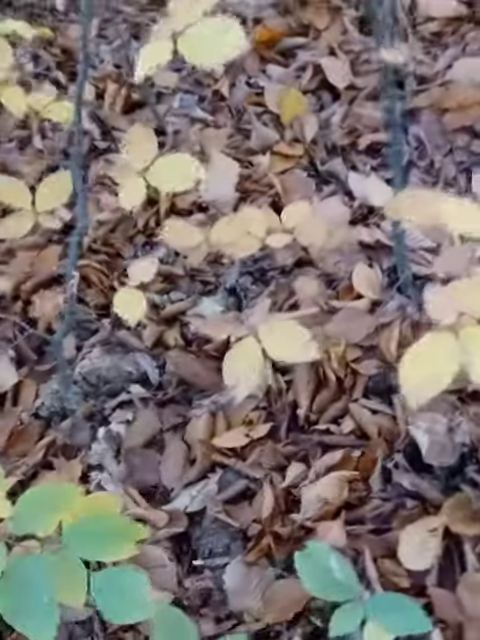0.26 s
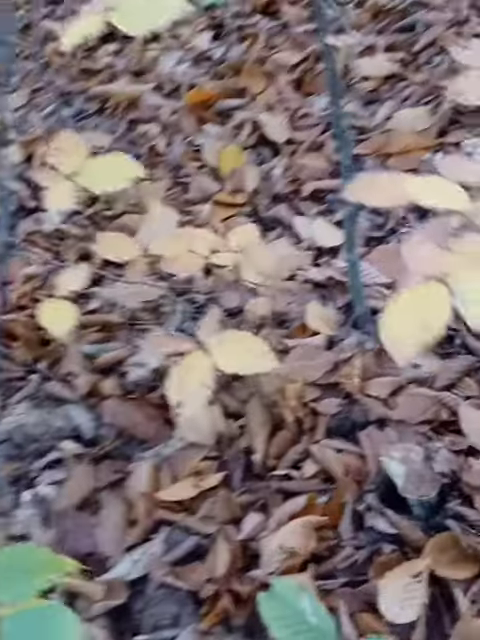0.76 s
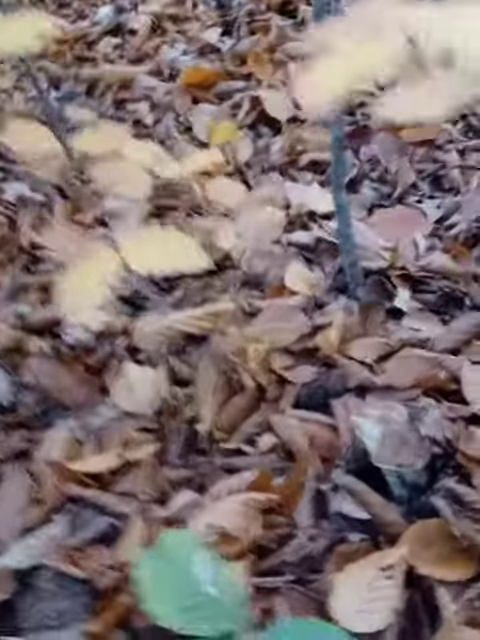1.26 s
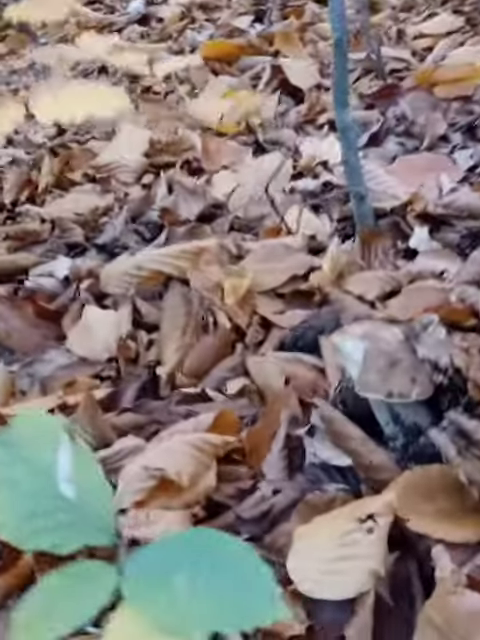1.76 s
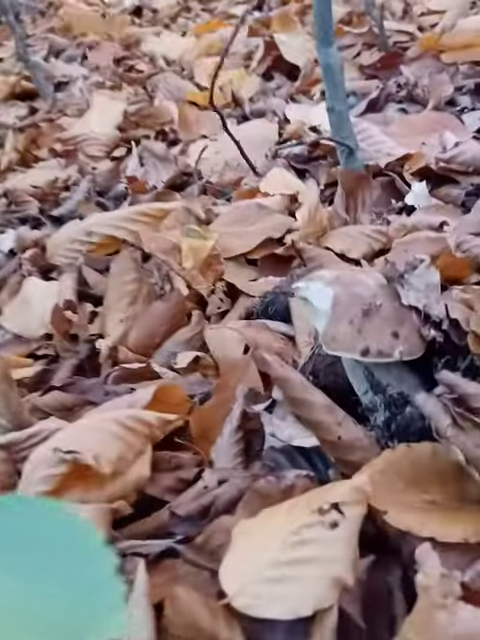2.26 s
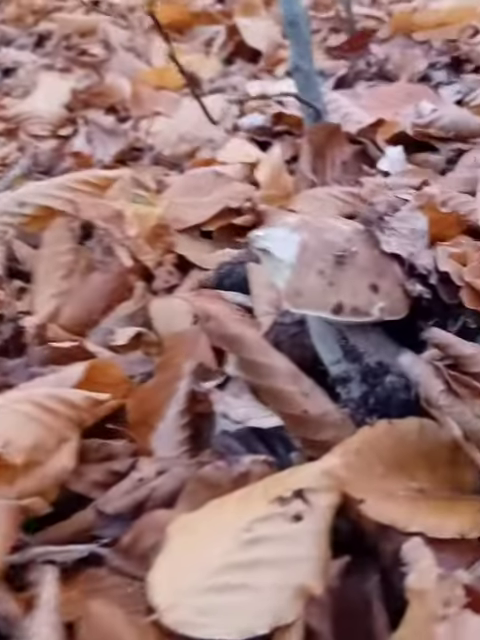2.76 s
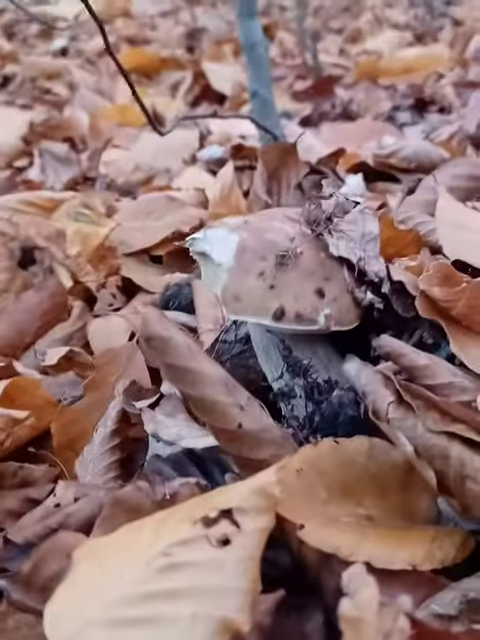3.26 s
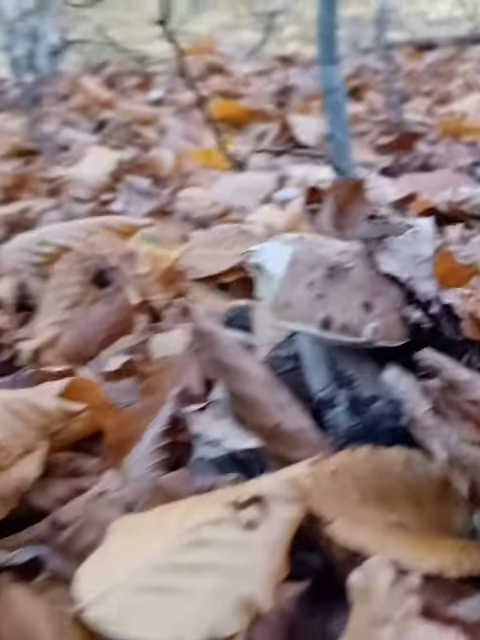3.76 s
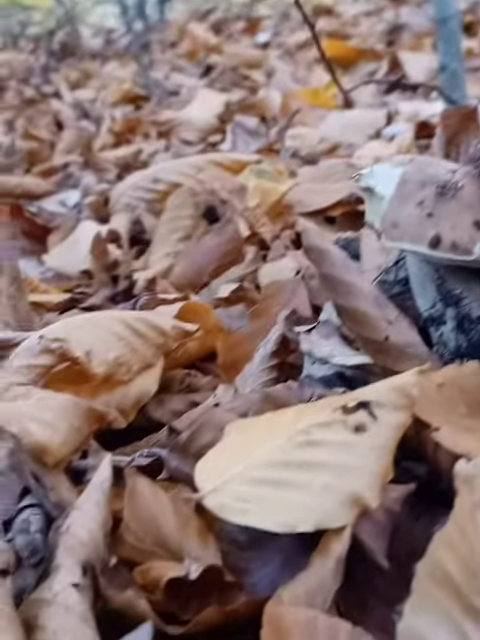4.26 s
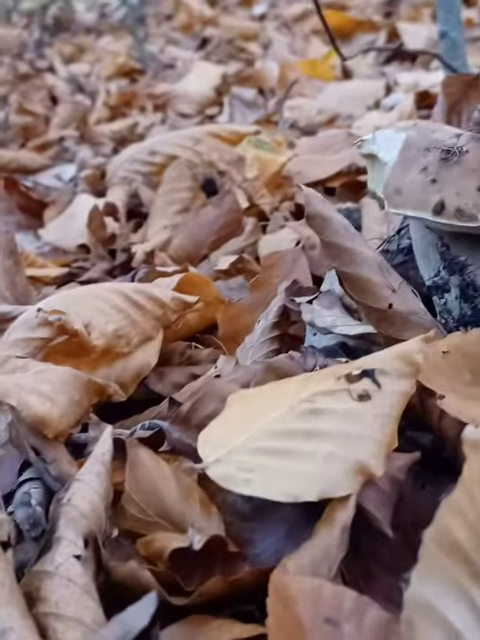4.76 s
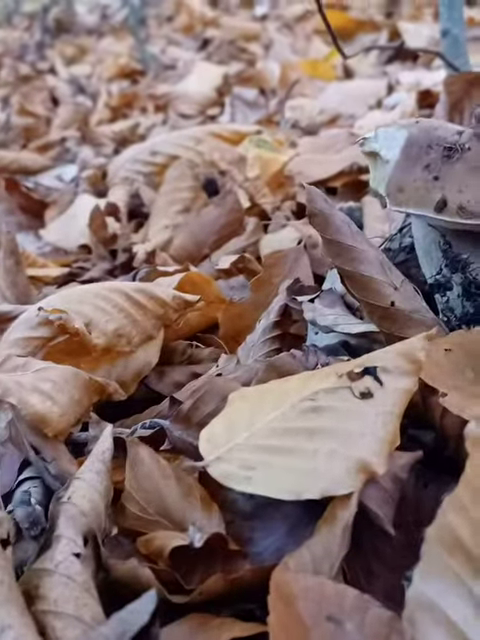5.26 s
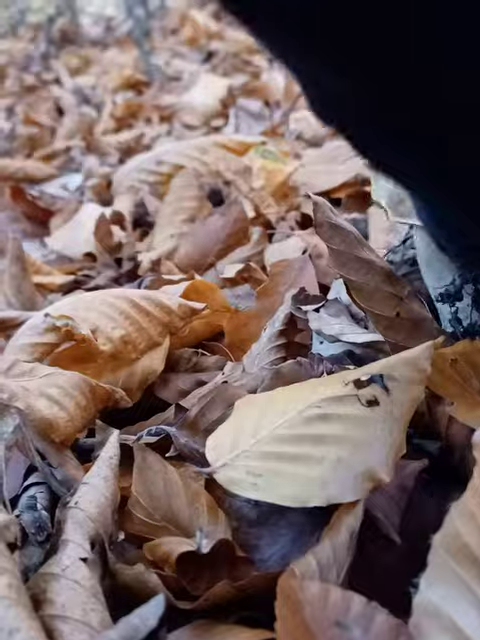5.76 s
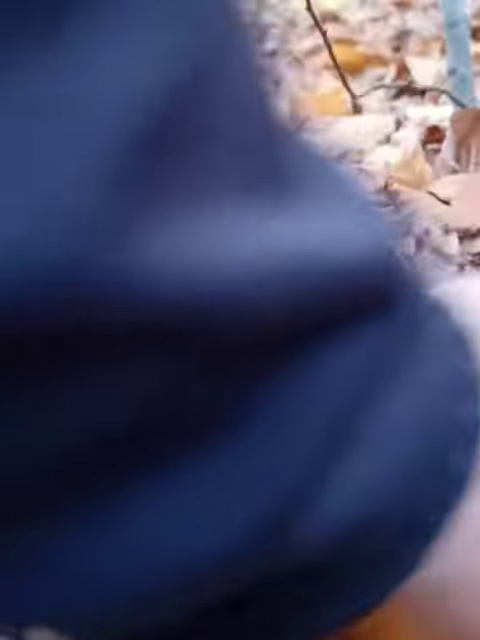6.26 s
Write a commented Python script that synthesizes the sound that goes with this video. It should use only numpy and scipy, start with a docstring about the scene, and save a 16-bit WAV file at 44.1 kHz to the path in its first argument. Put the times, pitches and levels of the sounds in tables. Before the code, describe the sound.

Feet shuffle through dry leaves, papery and crisp, with a strong crunch and snaps around one second. The rustle sinks to light crackling, then low muffled finger bumps and scratchy rubbing hit the right microphone. Sparse ticks follow in a quiet forest, until a sleeve and hand sweep close through the leaves, loud and hissing. Handheld phone, close, dry, stereo.

```python
"""Forest floor: feet shuffle through dry leaves, heard at a hand-held phone's two ports.
Noise chopped by thousands of tiny cracks makes the rustle, crumple and tread; larger snaps stand out.
Cloth hiss is mixed into the rustle throughout, fuller after 5.5 s.
Decaying sines make dull knocks and the bumps of a finger on the right port; shaped noise makes its rubbing.
Steady coloured noise is the faint forest air."""
import sys
import numpy as np
from scipy import signal
from scipy.io import wavfile
from scipy.ndimage import uniform_filter1d

SR = 44100
rng = np.random.default_rng(int(sys.argv[2]) if len(sys.argv) > 2 else 0)


def wav_record(signal):
    """Record a signal, one row per channel, as 16-bit PCM in the file named by sys.argv[1]."""
    frames = np.transpose(np.atleast_2d(signal))
    bounded = np.clip(frames, -1, 1)
    # unit amplitude maps onto the largest positive 16-bit level
    quanta = np.round(bounded * 32767).astype(np.int16)
    wavfile.write(sys.argv[1], SR, quanta)


N = 287159

# How hard the litter is stirred: t/s, fizz level/dB
STIRRING = [(0.0, -50), (0.2, -37), (0.36, -35), (0.6, -38), (0.96, -42), (1.07, -34), (1.32, -41.5),
            (1.66, -49), (1.8, -51), (2.1, -59), (2.37, -58), (2.66, -46), (2.85, -46.5), (3.52, -46.5),
            (3.68, -53), (3.74, -53), (3.79, -44.5), (3.85, -53), (3.95, -60), (4.02, -56.5), (4.26, -52.5),
            (4.44, -55), (4.52, -57), (4.66, -57), (4.84, -50), (5.02, -59), (5.45, -59), (5.53, -53),
            (5.78, -46), (5.95, -47.5), (5.99, -40.5), (6.03, -39), (6.08, -46), (6.24, -31.5),
            (6.35, -30.5), (6.46, -36), (6.51, -27)]
# Place and colour of the rustle:
# t/s, left over right/dB, sheen re fizz/dB, rasp f/Hz, papery boost/dB
LEAF_COLOUR = [(0.0, -5, -3.5, 4300, 5), (0.45, -2.5, -3.5, 4200, 9), (0.87, -10, -3, 4540, 1),
               (1.07, -5, -2.5, 4200, 8), (1.5, -12.5, 0.5, 4900, 4), (2.1, -13, -0.5, 4620, 8),
               (2.65, -5.5, -5, 3930, 4.5), (3.35, -8.5, -5, 4170, 6), (3.55, -9, -6, 4540, 2),
               (3.7, -6.5, -4, 3550, -3), (3.79, -20.5, -6, 3400, -1), (3.87, 2, -1, 3430, 7),
               (3.97, 0, -6.5, 3600, -5), (4.26, -5, -7.5, 4280, 2.5), (4.6, -14.5, -8, 5300, 2),
               (5.31, -15.5, -8, 4780, 4), (5.55, -3.5, -3.5, 4450, -4), (6.0, -1.5, -2, 4740, 5.5),
               (6.51, -2, -5, 4400, 4.5)]
# Weight pressing the litter down: t/s, tread level/dB, left over right/dB, whole-leaf crumple level/dB
TREAD_WEIGHT = [(0.0, -63.5, 0.5, -53), (0.15, -54.5, 0, -46), (0.45, -49, -0.5, -44),
                (0.93, -56.5, 0, -54), (1.04, -39, -1, -43), (1.3, -45, -2.5, -47.5), (1.5, -55, -2, -51),
                (1.71, -71, 1, -59), (2.03, -80.5, -4, -69), (2.3, -80, -7, -65), (2.79, -62.5, -9, -57.5),
                (3.1, -64.5, -6, -52), (3.16, -54.5, -12, -58.5), (3.44, -55.5, -13, -54),
                (3.5, -55.5, -11, -59.5), (4.5, -78, -9, -73), (4.83, -69.5, -17, -66.5),
                (5.04, -80, -7, -74.5), (5.45, -86, -4, -80), (5.54, -74, 1, -61.5), (5.62, -59, -1, -57.5),
                (5.92, -54.5, -4, -53), (6.04, -45.5, -2, -47.5), (6.14, -49.5, 0, -47),
                (6.32, -38, 1, -36), (6.43, -42, 0.5, -42), (6.51, -38.5, 3, -36.5)]
# Cloth hiss mixed into the rustle throughout, fuller after 5.5 s: t/s, share [0-1]
CLOTH_SHARE = [(5.46, 0.65), (5.53, 0.9), (6.51, 1)]
# Dry leaves through the phone's port, notched near 8 kHz: f/Hz, relative level/dB
LEAF_SPECTRUM = [(24, -52), (40, -16.5), (102, -11.5), (223, -4), (541, -6.5), (1650, -2.5), (2290, -2),
                 (3260, -1.5), (4200, -1.5), (6610, -8), (7900, -20), (12100, -3.5), (13800, -6.5),
                 (15600, -9), (16900, -57.5)]


def litter():
    """Leaf cracks as chopped noise: long waves reach both ports alike, short ones hardly."""
    fizz_db, = curves(STIRRING)
    pan_db, sheen_db, rasp_hz, paper_db = curves(LEAF_COLOUR)
    tread_db, low_pan_db, crumple_db = curves(TREAD_WEIGHT)
    cloth, = curves(CLOTH_SHARE)
    leaf_ir = colour(LEAF_SPECTRUM)

    fine = fine_crackle(fizz_db, cloth)
    fine_noise = pair(same=.05, lag_s=.00025, size=N) * fine
    _, _, fizz, sheen = bands(filtered(fine_noise, leaf_ir))
    fizz = leaf_rings(fizz, rasp_hz, paper_db, cloth)

    whole = crackle(per_s=270, spread_db=5.5, t60_s=.027, hiss_db=-15)
    whole_noise = pair(same=.79, lag_s=.0001, size=N) * (whole + .73 * fine)
    crumple = bands(filtered(whole_noise, leaf_ir))[1]

    coarse = crackle(per_s=110, spread_db=3.5, t60_s=.23, hiss_db=-10.5)
    coarse_noise = pair(same=.86, lag_s=0, size=N) * coarse
    tread = bands(filtered(coarse_noise, leaf_ir))[0]

    high = gain_of(fizz_db) * evened(fizz) + gain_of(fizz_db + sheen_db) * evened(sheen)
    high = high * ports(pan_db)
    middle = gain_of(crumple_db) * evened(crumple) * ports(.72 * pan_db + .78 * low_pan_db)
    low = gain_of(tread_db) * evened(tread) * ports(low_pan_db)
    return high + middle + low


CLUMP_RMS_DB, CLUMP_S = 1.4, .035


def fine_crackle(fizz_db, cloth):
    """Envelope: hard shoves and cloth blend cracks into hiss; settling leaves tick singly, in clumps."""
    fine = crackle(per_s=250, spread_db=4.5, t60_s=.009, hiss_db=.35 * (fizz_db + 38) + 6 * cloth)
    width = round(CLUMP_S * SR)
    clumps = uniform_filter1d(rng.standard_normal(N), width)
    clumps = uniform_filter1d(clumps, width)
    return fine * gain_of(CLUMP_RMS_DB * evened(clumps))


def leaf_rings(fizz, rasp_hz, paper_db, cloth):
    """Resonances: leaf rasp, low ring of broad flat leaves, higher cloth hiss, scattered crack pitches."""
    fizz = fizz + .62 * resonate(fizz, rasp_hz, width_hz=1800)
    fizz = fizz + (gain_of(paper_db) - 1) * resonate(fizz, 2100, width_hz=700)
    fizz = fizz + 1.1 * cloth * resonate(fizz, 5500, width_hz=1600)
    for spread in np.geomspace(.6, 1.6, num=4):
        envelope = crackle(per_s=60, spread_db=4, t60_s=.012, hiss_db=-10)
        cracks = pair(same=.45, lag_s=.00025, size=N) * envelope
        pitched = resonate(cracks, np.minimum(spread * rasp_hz, 6800), width_hz=700)
        fizz = evened(fizz) + gain_of(-15.5) * evened(pitched)
    return fizz


# Loud leaves and stalks snapping:
# t/s, relative level/dB, left over right/dB, relative sheen/dB, relative body/dB, f/Hz
LOUD_SNAPS = [(0.0381, -36.5, -8, 8.5, -15, 3930), (0.453, -24, -11, -10, -26, 2300),
              (0.579, -34, -14, 12.5, -23, 2370), (0.6088, -30, -10, 2, -12, 4110),
              (0.622, -24, -7, -7, -13, 5840), (0.644, -28, -6.0, 1.5, -18, 2300),
              (0.708, -19.5, -8.5, -6.5, -21, 4650), (0.7648, -31, -16, -1, -22, 4440),
              (0.8606, -27, -4, -29, -8, 5100), (0.8778, -22.5, -12, -25, -18, 4730),
              (0.906, -24.5, -9.5, -7, -18, 4260), (0.9503, -28.5, -11, -12, -20, 4290),
              (0.984, -6.5, -5, -11.5, -33, 5130), (1.0062, -8.5, -12, -13, -24, 5240),
              (1.0317, -17.5, 5, -19, -19, 3400), (1.1363, -13.5, 0, -13.5, -26, 4150),
              (1.1684, -17.5, -13, -25, -33, 4540), (1.207, -21, -9, -20, -30, 4240),
              (1.2323, -20.5, -4, -13, -28, 2500), (1.4611, -16.5, -9, -12, -16.5, 2310),
              (1.527, -33.5, -16, -3, -22, 5400), (1.6272, -31.5, -14, -6, -4, 3600),
              (1.6476, -28.5, -8.0, -16, -8, 2120), (1.6798, -29.5, -18, -5.5, -12, 6250),
              (1.7723, -41, -9.5, -7, -23, 3350), (1.8157, -41, -13, 1, -6, 3300),
              (1.9885, -39.5, -13.0, -5, -6.5, 2540), (2.024, -30, -11, -4.5, -14, 4100),
              (2.1118, -41, -15, -5, -27, 4580), (2.363, -26.5, -7, -19, -19, 3880),
              (2.527, -34.5, -6, 0.5, -21, 2540), (2.5592, -27.5, -9.5, -8.5, -18, 4390),
              (2.5736, -36, -7.5, -5, -11, 2560), (2.626, -31, -9, -3, -14, 2570),
              (2.6648, -29, -6.5, -8, -18, 2640), (2.69, -29, -7, -1.5, -16, 4170),
              (2.7326, -18.5, -4, -9.5, -23, 4800), (2.8324, -30, -8, -8, -11, 4200),
              (2.8825, -31, -9, -1.5, -27, 4150), (2.901, -29, 0, -16, -26, 3500),
              (2.9127, -17, -4, -16, -21, 3680), (2.9787, -26.5, -4, -14, -31, 3740),
              (3.0041, -33.5, -6.5, 1, -17, 2860), (3.058, -29.5, -5.5, -6, -17, 3840),
              (3.0947, -24.5, -5, -15, -14.5, 2660), (3.1656, -30.5, -7.5, -5.5, -11, 4000),
              (3.2172, -20, -9, -14, -27, 4050), (3.2403, -23.5, -17, -13.5, -32, 4830),
              (3.2578, -20, -10.5, -20, -28, 5070), (3.438, -23, -14.5, -24, -25, 3840),
              (3.4564, -13, -8.0, -11, -15, 3580), (3.4764, -25, -6, -5, -19, 2340),
              (3.5012, -22.5, -30, -23, -25, 4230), (3.5583, -23, -5, -19, -20, 5100),
              (3.6635, -22, -20, -28, -19, 2050), (3.759, -28, -6, -9, -17, 3550),
              (3.767, -21, -35.0, -16, -3, 2660), (3.7802, -29, -32, -29, -5, 2340),
              (3.8293, -15, -3, -16.5, -19, 3500), (3.8482, -30, -7.0, -12, -15, 2930),
              (3.9478, -33.5, 1, -14, -27, 3630), (4.0023, -36.5, 0, -3.5, -19, 3300),
              (4.1195, -27.5, -10, -20, -21, 3200), (4.1588, -33.5, -9.0, -13, -18, 2370),
              (4.198, -27.5, -18, -20, -22, 3750), (4.2379, -26, -11, -15, -11.5, 4200),
              (4.2955, -25, -9.0, -32, -14, 2230), (4.3197, -32, -16, -19, -18, 4750),
              (4.342, -23, -14.5, -23, -21.5, 5130), (4.372, -32, -24, -25, -16, 3680),
              (4.394, -30.5, -14.0, -16, -12.5, 5060), (4.4473, -29.5, -12, -7.5, -23, 4630),
              (4.604, -30.5, -22, -8, -20.5, 5910), (4.7092, -35, -21.0, -19, -27, 5280),
              (4.727, -23.5, -22.5, -19.5, -30, 5200), (4.776, -21, -20.5, -23, -24, 5940),
              (4.7985, -30, -13, -21, -25, 5800), (4.8328, -31, -10, -14, -29, 5250),
              (4.8786, -15, -21.5, -28, -29, 5400), (4.9162, -29, -14.0, -15, -22, 4820),
              (4.9664, -37, -15, -18, -18, 4310), (5.0546, -32.5, -21, -11.5, -29, 6110),
              (5.1027, -41.5, -15.5, -21, -11.5, 4540), (5.2077, -47.5, -14.0, -13, -19, 3590),
              (5.2844, -39.5, -17, -14, -34, 4970), (5.3248, -29.5, -27, -6, -29, 4900),
              (5.3538, -46, -13.5, -19, -27, 4480), (5.4473, -42.5, -18, -23, -24, 3840),
              (5.63, -26.5, -4.0, -13, -15.5, 5190), (5.7355, -35, -3.0, -3, -11, 3200),
              (5.8274, -24.5, -6, -8, -17, 5660), (5.8635, -33, -8, -10, -31, 3400),
              (5.9277, -20.5, -13, -14, -33, 5530), (5.9571, -28.5, -2.0, -5, -15, 4490),
              (5.9812, -10.5, -29, -18, -29, 5780), (6.133, -26, 2, -10, -18, 2100),
              (6.2103, -20, 2, -21, -22, 4090), (6.2246, -15, 1, -23, -15, 5530),
              (6.342, -12.5, -5.0, -14, -13, 4120), (6.4773, -8.5, 5, -11.5, -27, 4140)]


def snaps():
    """Each snap: a sharp break, a quieter noise burst swelling before and fading after, at its own pitch."""
    out = np.zeros((2, N))
    t_s = np.arange(1800) / SR - .006
    leaf_ir = colour(LEAF_SPECTRUM, size=512)
    # 60 dB rise and fall times
    crack = gain_of(-60 * np.where(t_s < 0, -t_s / .00045, t_s / .0024))
    burst = gain_of(-60 * np.where(t_s < 0, -t_s / .013, t_s / .022))
    shape = crack + gain_of(-12.5) * burst
    for s, db, pan_db, sheen_db, body_db, hz in list(LOUD_SNAPS) + small_snaps():
        noise = pair(same=.13, lag_s=.00027, size=len(t_s)) * shape
        _, body, fizz, sheen = bands(filtered(noise, leaf_ir))
        fizz = fizz + 8.2 * resonate(fizz, hz, width_hz=730)
        fizz, sheen, body = (v / abs(v).max(1, keepdims=True) for v in (fizz, sheen, body))
        sound = fizz + gain_of(sheen_db + 11) * sheen + gain_of(body_db + 5.5) * body
        add(out, s - .0054, gain_of(db - 1) * ports(pan_db)[:, None] * sound)
    return out


TICKS, TICK_DB, TICK_SHARE, TICK_SPREAD_DB = 70, -5.5, .59, .5  # level: share of the rustle's dB, offset
TICK_SHEEN_DB, TICK_BODY_DB = -9.5, -21
AFTER_S = .03  # typical delay after a loud snap


def small_snaps():
    """Random rows trailing the loud snaps, about the rustle's level, place and colour."""
    which, late, size, side, shine, bulk, pitch = rng.random((TICKS, 7)).T
    loud_s = np.transpose(LOUD_SNAPS)[0]
    parent_s = loud_s[(which * len(loud_s)).astype(int)]
    tick_s = parent_s + .004 - AFTER_S * np.log(late + .02)
    at = np.minimum(tick_s * SR, N - 1).astype(int)
    fizz_db, = curves(STIRRING)
    pan_db, sheen_db, rasp_hz, _ = curves(LEAF_COLOUR)
    level_db = TICK_SHARE * fizz_db[at] + TICK_DB - TICK_SPREAD_DB * np.log(size + .08)
    tick_pan_db = pan_db[at] + 8 * (side - .5)
    tick_sheen_db = sheen_db[at] + TICK_SHEEN_DB + 14 * (shine - .5)
    body_db = TICK_BODY_DB + 14 * (bulk - .5)
    hz = rasp_hz[at] * (.6 + .7 * pitch)
    return list(zip(at / SR, level_db, tick_pan_db, tick_sheen_db, body_db, hz))


# Dull knocks in the litter: t/s, relative level/dB, left over right/dB, f/Hz
DULL_KNOCKS = [(0.111, -31.5, -0.5, 345), (0.185, -33.5, 0, 328), (0.456, -32.5, -20, 240),
               (0.705, -28, 0, 746), (0.905, -37.5, 2, 242), (1.091, -25.5, -3, 345), (1.259, -31, -1, 394),
               (1.357, -34, -1, 494), (1.457, -35.5, -3.0, 406), (1.593, -28, -6, 830),
               (1.624, -36, -3.5, 263), (1.799, -44.5, -6.0, 960), (2.826, -44, -12, 360),
               (3.098, -40.5, -12, 428), (3.148, -37, -24, 236), (3.452, -30.5, -8, 207),
               (5.621, -43, -3, 905), (5.824, -43, -8, 254), (5.99, -28.5, -1, 880), (6.028, -34, 3, 410),
               (6.169, -34, 3, 514), (6.259, -28, 16, 541), (6.298, -31, -5, 145),
               (6.364, -21.5, -3.5, 215), (6.45, -30, 4, 230)]


def knocks():
    """Short hollow thuds: a low ring with an overtone, the same waveform at both ports."""
    out = np.zeros((2, N))
    for s, db, pan_db, hz in DULL_KNOCKS:
        thud = ring(hz, cycles=11, lead=.64)
        thud = thud + .94 * ring(2.22 * hz, cycles=4.6, lead=.34)
        add(out, s + .0021, gain_of(db - 2.5) * ports(pan_db)[:, None] * thud)
    return out


# Fingertip closing on the right port: t/s, relative level/dB, trapped-air f/Hz
FINGER_BUMPS = [(3.523, -28, 193), (3.584, -20, 217), (3.605, -17.5, 240), (3.62, -1, 226),
                (3.66, -17, 258), (3.666, 0.5, 228), (3.753, -4.5, 277), (3.817, -17, 156),
                (3.907, -22, 162), (3.98, -15.5, 175), (4.088, -13, 190), (4.109, -19, 195),
                (4.189, -15.5, 221), (4.211, -23, 195), (4.273, -18.5, 175), (4.307, -28, 221),
                (4.429, -36, 178)]
# Finger sliding over the right port: start t/s, end t/s, relative level/dB, treble re low band/dB
FINGER_RUBS = [(3.498, 3.61, -43, -7), (3.622, 3.627, -29.5, -3.5), (3.631, 3.67, -29.5, -17),
               (3.665, 3.694, -24, -5), (3.691, 3.767, -37.5, -8.5), (3.754, 3.816, -19.5, 0.5),
               (3.8, 4.156, -47.5, -7), (4.149, 4.261, -39.5, -6), (4.265, 4.33, -42, -6),
               (4.404, 4.456, -50, -3.5)]
# Skin on the port: f/Hz, relative level/dB
SKIN_SPECTRUM = [(18, -60), (30, -18), (76, 1.5), (223, -2), (752, -10.5), (828, -5.5), (1470, -14),
                 (3150, -15.5), (6600, -33), (9000, -80), (11700, -77.5), (19800, -120)]


def finger():
    """Pressure puffs and skin friction sealed into the right port; a trace leaks to the left."""
    out = np.zeros(N)
    turns = np.linspace(0, 1.5, num=600)
    heave = -np.sin(2 * np.pi * turns) * np.hanning(len(turns))  # membrane swings back and settles
    for s, db, hz in list(FINGER_BUMPS) + slips():
        puff = ring(hz, cycles=3.3, lead=.54) + .43 * ring(1.55 * hz, cycles=3.2, lead=.46)
        add(out, s - .001, gain_of(db) * puff)
        add(out, s + .0029, gain_of(db - 12.5) * heave)

    friction = rng.standard_normal(N) * crackle(per_s=600, spread_db=2.8, t60_s=.005, hiss_db=1.6)
    skin = signal.oaconvolve(friction, colour(SKIN_SPECTRUM))[:N]
    low, *rest = bands(evened(skin))
    treble = sum(rest)
    for start_s, end_s, db, treble_db in FINGER_RUBS:
        span = slice(round(start_s * SR), round(end_s * SR))
        piece = evened(low[span]) + gain_of(treble_db) * evened(treble[span])
        add(out, start_s, gain_of(db + 1) * piece * signal.windows.tukey(len(piece), .12))
    return out * gain_of([[-58], [0]])


# Fingertip sticking and slipping: start t/s, end t/s, relative level/dB, slip rate [1/s], f/Hz
FINGER_JUDDERS = [(3.696, 3.764, -19, 120, 184.5), (3.992, 4.045, -19.5, 105, 160)]


def slips():
    """Stick-slip friction: each judder as small bumps, uneven in time and level."""
    rows = []
    for start_s, end_s, db, per_s, hz in FINGER_JUDDERS:
        late, size = rng.standard_normal((2, 12))
        slip_s = start_s + (np.arange(len(late)) + .082 * late) / per_s
        rows += [(s, db + 2.5 * b, hz) for s, b in zip(slip_s, size) if s < end_s]
    return rows


# Still forest: f/Hz, relative level/dB
AIR_SPECTRUM = [(24, -51), (40, 20.5), (253, 22.5), (326, -25.5), (1310, 6), (2170, -20.5), (5270, 6),
                (8100, -61.5), (14500, 23.5), (15600, -8.5), (16900, -57.5)]
AIR_DB = -70.5


def forest():
    """Faint steady air among the trees: independent coloured noise, louder on the right."""
    air = filtered(rng.standard_normal((2, N)), colour(AIR_SPECTRUM))
    return gain_of(AIR_DB) * evened(air) * ports(np.array([-8.0]))


def crackle(per_s, spread_db, t60_s, hiss_db):
    """Envelope of overlapping cracks that swell and fade, a few of them large, over a smooth hiss."""
    size = gain_of(spread_db * np.minimum(rng.exponential(1, N), 4))
    power = (size * (rng.random(N) < per_s / SR)) ** 2
    decay = gain_of(-120 / (t60_s * SR))  # power decay per sample
    power = signal.lfilter([1], [1, -decay], power)
    power = signal.lfilter([1], [1, -decay], power[::-1])[::-1]
    hiss_power = gain_of(2 * hiss_db)
    return np.sqrt((abs(power) / power.mean() + hiss_power) / (1 + hiss_power))


def ring(hz, cycles, lead, size=2400):
    """Sine, dip first: swells over lead cycles, decays 60 dB in the given cycles; peak 1."""
    turns = hz * np.arange(size) / SR
    swell = np.minimum(turns / lead, 1)
    wave = np.sin(2 * np.pi * (turns - lead / 2)) * swell * gain_of(-60 * turns / cycles)
    return wave / wave.max()


def resonate(x, hz, width_hz):
    """Moving resonance: shifts the curve hz down to zero, smooths, shifts back."""
    turn = np.exp(2j * np.pi * np.cumsum(hz * np.ones(x.shape[-1])) / SR)
    r = np.exp(-np.pi * width_hz / SR)
    return 2 * (turn * signal.lfilter([1 - r], [1, -r], x / turn)).real


def pair(same, lag_s, size):
    """Noise at two ports: the left gets a delayed share of the right plus its own."""
    own, right = rng.standard_normal((2, size))
    shared = same * np.roll(right, round(lag_s * SR))
    return np.array([shared + np.sqrt(1 - same ** 2) * own, right])


def ports(pan_db):
    """Left and right gains; the mean of two unrelated rms-1 ports gets rms 1."""
    left = gain_of(pan_db)
    return 2 * np.array([left, np.ones_like(left)]) / np.sqrt(1 + left ** 2)


def colour(points, size=4096):
    """Causal impulse response of a spectrum: the phase follows from the log gain."""
    f, db = np.transpose(points)
    hz = abs(np.fft.fftfreq(2 * size, 1 / SR))
    log_gain = np.log(gain_of(np.interp(np.log(hz + 1), np.log(f), db)))
    return np.fft.ifft(np.exp(np.conj(signal.hilbert(log_gain)))).real[:size]


def filtered(x, ir):
    """Convolves both ports with one impulse response, length kept."""
    return signal.oaconvolve(x, ir[None])[:, :x.shape[-1]]


SPLIT_HZ = (600, 2000, 8000)


def bands(x):
    """Splits into tread (low), crumple or body, fizz and sheen (high)."""
    low, mid, high = SPLIT_HZ
    edges = [(low, "low"), ([low, mid], "band"), ([mid, high], "band"), (high, "high")]
    filters = [signal.butter(N=3, Wn=hz, btype=kind, fs=SR, output="sos") for hz, kind in edges]
    return [signal.sosfilt(sos, x) for sos in filters]


def curves(rows):
    """Every column after t/s, interpolated sample by sample."""
    s, *columns = np.transpose(rows)
    return [np.interp(np.arange(N) / SR, s, c) for c in columns]


def gain_of(db):
    """Decibels to amplitude."""
    return 10 ** (np.asarray(db) / 20)


def evened(x):
    """Scales to rms 1."""
    return x / np.sqrt(np.mean(x ** 2) + 1e-20)


def add(mix, s, sound):
    """Mixes a sound in at time s, cut at the end."""
    part = mix[..., round(s * SR):][..., :sound.shape[-1]]
    part += sound[..., :part.shape[-1]]


def scene():
    """All sources at the two ports."""
    return litter() + snaps() + knocks() + finger() + forest()


LOW_CUT_HZ, EDGE_HZ = 70, 16050
RUMBLE_DB, CLIP_LEVEL = -85, .93


def record(dry):
    """Steep low cut against wind, a trace of amplifier rumble, clipped peaks, then the band limit."""
    low_cut = signal.butter(N=5, Wn=LOW_CUT_HZ, btype="high", fs=SR, output="sos")
    cut = signal.sosfilt(low_cut, dry)
    rumble = signal.lfilter([1], [1, -.99], rng.standard_normal(dry.shape))
    noisy = cut + gain_of(RUMBLE_DB) * evened(rumble)
    clipped = np.clip(noisy, -CLIP_LEVEL, CLIP_LEVEL)
    band_limit = signal.firwin(511, EDGE_HZ, window=("kaiser", 9), fs=SR)
    return signal.oaconvolve(clipped, band_limit[None], "same")


dry = scene()
out = record(dry)
wav_record(out)
```